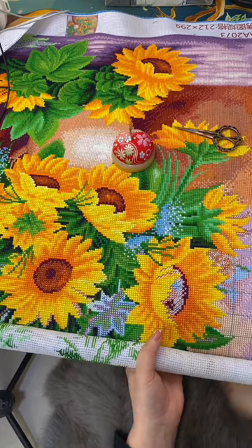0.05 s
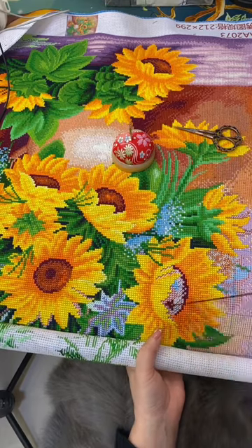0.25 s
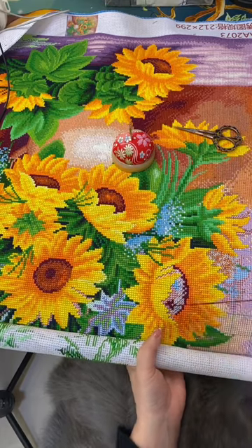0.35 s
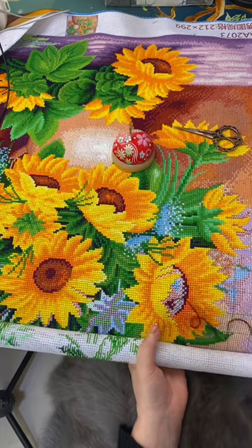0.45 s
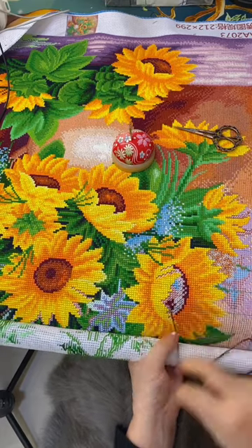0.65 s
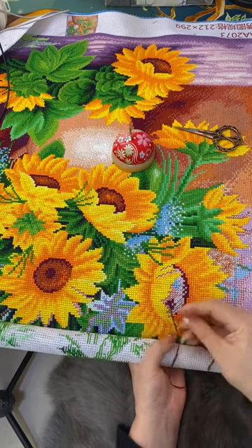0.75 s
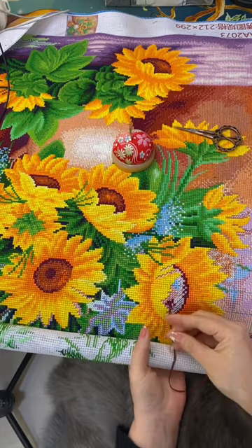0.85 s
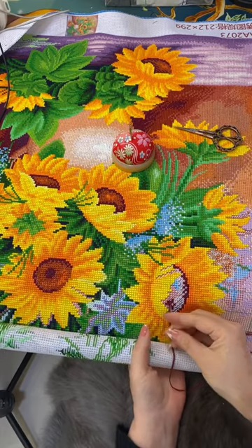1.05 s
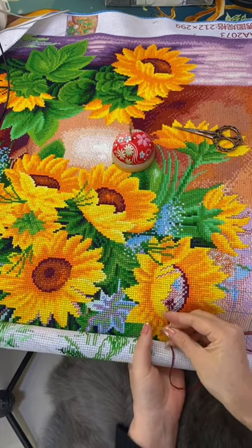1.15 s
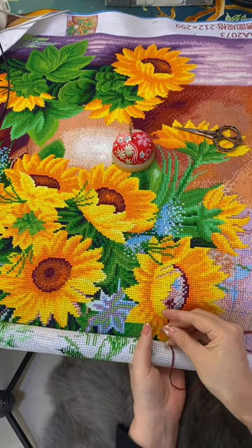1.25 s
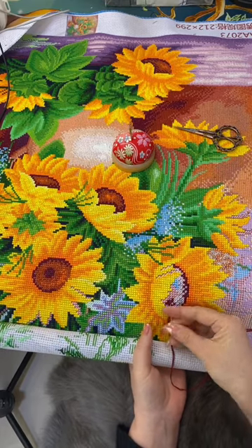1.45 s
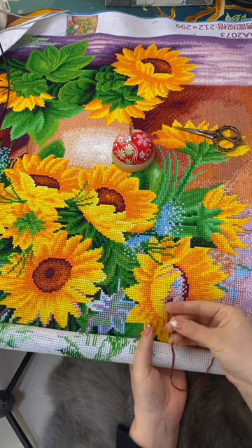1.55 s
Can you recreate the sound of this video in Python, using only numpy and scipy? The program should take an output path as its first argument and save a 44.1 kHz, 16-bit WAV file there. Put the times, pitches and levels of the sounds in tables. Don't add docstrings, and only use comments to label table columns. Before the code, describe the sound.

Close up in a small quiet room, faint frame rocking and cloth brushing lead to a drum-like needle pop and short dry thread rasp, then light flicks, tiny squeaks and near silence with sparse ticks.

```python
import sys
import numpy as np
from scipy import signal
from scipy.fft import rfft, irfft
from scipy.io import wavfile

SR = 44100
rng = np.random.default_rng(int(sys.argv[2]) if len(sys.argv) > 2 else 0)


def store_wav(level_fs):
    pcm = np.round(np.clip(np.atleast_2d(level_fs), -1, 1) * 32767)
    wavfile.write(sys.argv[1], SR, pcm.T.astype(np.int16))


def magnitude_from_level(level_db):
    exponent = np.asarray(level_db, float) / 20
    return 10 ** exponent


N = 70560

# pitch in Hz, level in dB per Hz.
AIR_COLOUR = [(25, -16), (55, -9), (122, -4.5), (215, -10.5), (600, -16), (1500, -24.5), (8000, -37),
              (15500, -44.5)]
AIR_DB, AIR_WOBBLE_DB, AIR_TOP_HZ = -63.5, .5, 14400
HUM_HZ, HUM_WIDTH_HZ, HUM_DB, HUM_STEADY_DB = 122, 25, -78, -71
WHINE_HZ, WHINE_DB = 11536, -99

# start in seconds, length in seconds, pitch in Hz, level in dB.
FRAME_ROCKS = [(.004, .045, 77.5, -51), (0.029, 0.033, 94, -54.5), (0.102, 0.043, 76, -50.5),
               (0.209, 0.027, 115, -49), (0.299, 0.032, 80, -52.5), (0.352, .035, 56.5, -46),
               (0.385, 0.043, 76.4, -47), (.435, .03, 94, -52.5), (0.525, 0.038, 69.5, -47.5),
               (.522, 0.057, 175.5, -54.5), (0.546, 0.038, 112, -55), (0.634, 0.029, 68, -60),
               (0.809, 0.019, 108, -56.5)]

# start in seconds, length in seconds, level in dB.
HAND_BRUSHES = [(.004, 0.063, -65.5), (0.074, 0.041, -64), (0.107, 0.054, -61.5), (0.157, .025, -65.5),
                (0.213, 0.11, -70), (0.39, 0.2, -70), (0.528, 0.018, -64), (0.543, 0.069, -73),
                (0.585, 0.056, -68), (0.603, 0.076, -68), (0.68, .1, -77), (.755, 0.055, -69),
                (0.803, 0.11, -69.5), (1.53, 0.11, -71)]
# pitch in Hz, level in dB per Hz.
BRUSH_COLOUR = [(300, 11.5), (1000, -4.5), (2200, -3), (4000, -8.5), (7000, -13), (11000, -9.5),
                (15500, -16.5)]

# start in seconds, pitch in Hz, level in dB, time to fade by 60 dB in seconds.
CLOTH_FLICKS = [(0.02, 454, -49, 0.019), (0.026, 332, -53.5, 0.017), (.2090, 500, -48, 0.016),
                (0.215, 404, -58, 0.0092), (0.256, 494, -42, 0.011), (.3460, 232, -49, 0.048),
                (.3570, 520, -40, 0.031), (0.415, 238, -45.5, 0.018), (.5325, 311, -47, 0.037),
                (.5460, 206, -47, 0.034), (.5615, 2180, -47, 0.0098), (.5635, 555, -49, 0.035),
                (.5640, 2080, -48, .012), (0.62, 253, -61, 0.025), (0.5733, 290, -49.5, 0.037),
                (.5990, 2250, -63, .04), (.8128, 643, -44, 0.011), (.8170, 1130, -52, .012),
                (0.8185, 350, -49, 0.0085)]

TICK_STARTS = [
    .1120,
    .2085,
    .2391,
    .5322,
    .5613,
    .8102,
    .8168,
    1.178,
    1.488,
    1.540,
]
# length in seconds, level in dB, body pitch in Hz, level of the bright edge in dB.
TICK_SHAPES = [(0.0027, -86, 7600, -2), (.001, -68, 2100, -15), (0.0004, -44, 3100, -16),
               (0.0037, -62, 2000, -18), (0.003, -51.5, 1960, -2), (0.0065, -56, 1360, -33),
               (0.0012, -54.5, 2000, -14), (0.0022, -73, 4320, 2), (0.0018, -63, 2000, -25),
               (0.0022, -77, 4320, 5)]
TICK_BRIGHT_HZ, TICK_TAIL_S = 10100, 0.0032
TICK_WIDTH_SHARE = 0.59

# start in seconds, length in seconds, pitch in Hz, level in dB.
FINGER_SQUEAKS = [
    (0.126, 0.0097, 2520, -53.5),
    (0.146, 0.011, 2650, -76),
    (0.595, .018, 2190, -63),
    (0.622, 0.012, 2200, -69),
    (.634, 0.021, 2240, -68),
    (0.831, .014, 2440, -72),
]
SQUEAK_WIDTH_HZ = 240

THUMP_START_S, THUMP_LENGTH_S, THUMP_CREST_S = .2330, .0315, .2546
THUMP_HZ, THUMP_DB = 82, -25
THUMP_RISE_SHARE = .76
THUMP_EDGE = 1.28

# time in seconds, drag in dB.
THREAD_DRAG = [
    (0.237, -88),
    (0.239, -47.5),
    (0.257, -55.5),
    (0.269, -50),
    (.298, -48.5),
    (0.345, -49.5),
    (.360, -54),
    (.367, -67),
    (.380, -87),
]
FIBRES_PER_S, FIBRE_SPREAD_DB, FLUTTER_DB = 11000, 2.3, 1.8
# pitch in Hz, width in Hz, level in dB.
WEAVE_RESONANCES = [(213, 100, -15), (520, 135, 0), (742, 177, -2.5), (990, 122, -2), (1260, 160, -4),
                    (1650, 174, -9.5), (2190, 250, -11.5), (2920, 650, -14.5), (4600, 510, -11.5),
                    (7650, 540, -9), (8440, 1200, -11.5), (11550, 850, -12.5), (13200, 1800, -16),
                    (14800, 590, -21)]
BODY_TOP_HZ, BODY_EXTRA_SWING, BODY_FULL_DB = 4000, 0.36, -52

POP_S = .2408
# pitch in Hz, level in dB, time to fade by 60 dB in seconds.
CLOTH_TONES = [(318, -25.5, .034), (450, -38, .018), (610, -39, .016), (970, -44, .015), (1500, -47, .008)]

ECHO_T60_S, ECHO_DB = .15, -17


def rms_one(x):
    return x / np.sqrt(np.mean(x ** 2) + 1e-20)


def coloured(points):
    hz, db = np.transpose(points)
    f = np.arange(N // 2 + 1) * SR / N + 1
    gain = magnitude_from_level(np.interp(np.log(f), np.log(hz), db)) * (f > 15)
    return rms_one(irfft(rfft(rng.standard_normal(N)) * gain, N))


def resonate(x, hz, width_hz):
    r = np.exp(-np.pi * width_hz / SR)
    top = [(1 - r * r) / 2, 0, (r * r - 1) / 2]
    return signal.lfilter(top, [1, -2 * r * np.cos(2 * np.pi * hz / SR), r * r], x)


def ring(start, hz, db, t60):
    t = np.maximum(np.arange(N) / SR - start, 0)
    return magnitude_from_level(db - 60 * np.minimum(t / t60, 4)) * np.sin(2 * np.pi * hz * t)


def swell(start, length, share):
    u = (np.arange(N) / SR - start) / length
    share = np.clip(share, .05, .95)
    ramp = np.clip(np.minimum(u / share, (1 - u) / (1 - share)), 0, 1)
    return np.sin(np.pi / 2 * ramp) ** 2


def drift(rate):
    knots = rng.standard_normal(N // 20)
    return np.interp(np.arange(N) / SR * rate, np.arange(len(knots)), knots)


def room_tone():
    air = signal.sosfilt(signal.ellip(8, 1, 40, AIR_TOP_HZ, fs=SR, output="sos"), coloured(AIR_COLOUR))
    air_level = magnitude_from_level(AIR_DB + AIR_WOBBLE_DB * drift(12.2))
    rough_hum = resonate(rng.standard_normal(N), HUM_HZ, HUM_WIDTH_HZ)
    rough_hum = rms_one(resonate(rough_hum, HUM_HZ, 2 * HUM_WIDTH_HZ))
    turns = np.cumsum(HUM_HZ + 3.11 * drift(8)) / SR
    steady_hum = np.sqrt(2) * magnitude_from_level(1.5 * drift(7.3)) * np.sin(2 * np.pi * turns)
    whine = rms_one(resonate(rng.standard_normal(N), WHINE_HZ, 23.0))
    hum = magnitude_from_level(HUM_DB) * rough_hum + magnitude_from_level(HUM_STEADY_DB) * steady_hum
    return air_level * air + hum + magnitude_from_level(WHINE_DB) * whine


def frame():
    t = np.arange(N) / SR
    out = 0
    for start, length, hz, db in FRAME_ROCKS:
        rocking = np.sin(2 * np.pi * hz * (t - start) - np.pi / 2)
        out = out - magnitude_from_level(db) * swell(start, length, 0.53) * rocking
    return out


def hands():
    strokes = sum(magnitude_from_level(db) * swell(start, length, 0.23) ** .5 for start, length, db in HAND_BRUSHES)
    return coloured(BRUSH_COLOUR) * magnitude_from_level(3.7 * drift(200)) * strokes


def flicks():
    return sum(ring(*flick) for flick in CLOTH_FLICKS)


def ticks():
    t = np.arange(N) / SR
    grit = rng.choice([-1, 1], N) * magnitude_from_level(drift(1500))
    high = signal.butter(2, TICK_BRIGHT_HZ, "high", fs=SR, output="sos")
    out = 0
    for start, (length, db, hz, bright_db) in zip(TICK_STARTS, TICK_SHAPES):
        fade = np.exp(-np.clip(t - start - length, 0, .2) / TICK_TAIL_S * 2)
        burst = grit * (t >= start) * fade + 1e-18
        width_hz = TICK_WIDTH_SHARE * hz
        body = resonate(resonate(burst, hz, width_hz), hz, 2 * width_hz)
        body = body - 1.43 * resonate(burst, 0.48 * hz, 0.16 * hz)
        out = out + magnitude_from_level(db) * (3 * body + magnitude_from_level(bright_db) * signal.sosfilt(high, burst))
    return out


def squeaks():
    noise = rng.standard_normal(N)
    out = 0
    for start, length, hz, db in FINGER_SQUEAKS:
        rub = resonate(resonate(noise, hz, SQUEAK_WIDTH_HZ), hz, SQUEAK_WIDTH_HZ)
        out = out + magnitude_from_level(db) * swell(start, length, .3) * rms_one(rub)
    return out


def thump():
    swing = np.cos(2 * np.pi * THUMP_HZ * (np.arange(N) / SR - THUMP_CREST_S))
    size = magnitude_from_level(THUMP_DB) * swell(THUMP_START_S, THUMP_LENGTH_S, THUMP_RISE_SHARE)
    return size * np.tanh(THUMP_EDGE * swing)


def thread():
    s, db = np.transpose(THREAD_DRAG)
    drag_db = np.interp(np.arange(N) / SR, s, db, -140, -140)
    sizes = magnitude_from_level(FIBRE_SPREAD_DB * np.minimum(rng.exponential(1, N), 5)) * rng.choice([-1, 1], N)
    catches = rms_one(sizes * (rng.random(N) < FIBRES_PER_S / SR))
    body_swing = magnitude_from_level(BODY_EXTRA_SWING * np.clip(drag_db - BODY_FULL_DB, -12, 6))
    rasp = 0
    for k, (hz, width_hz, band_db) in enumerate(WEAVE_RESONANCES):
        fluttering = catches * magnitude_from_level(FLUTTER_DB * drift(150.8))
        band = (-1) ** k * magnitude_from_level(band_db) * rms_one(resonate(fluttering, hz, width_hz))
        rasp = rasp + band * (body_swing if hz < BODY_TOP_HZ else 1)
    return magnitude_from_level(drag_db - 3.5) * rasp


def pop():
    return sum(ring(POP_S, *tone) for tone in CLOTH_TONES)


def echo(x):
    t = np.arange(SR // 2) / SR
    dull = signal.lfilter([.4], [1, -.6], rng.standard_normal(len(t)))
    tail = dull * magnitude_from_level(-60 * t / ECHO_T60_S) * (t > .006)
    return signal.fftconvolve(x, tail / np.sqrt(np.sum(tail ** 2)))[:N]


def scene():
    near = flicks() + ticks() + squeaks() + thread() + pop()
    return (near + magnitude_from_level(ECHO_DB) * echo(near) + thump() + frame() + hands() + room_tone())[None]


def band_limit(x):
    return signal.sosfilt(signal.butter(12, 16150, fs=SR, output="sos"), x)


def record(dry):
    top_cut = signal.ellip(12, 1, 45, 15500, fs=SR, output="sos")
    mix = signal.sosfilt(top_cut, dry)
    return band_limit(mix)


dry = scene()
out = record(dry)
store_wav(out)
```